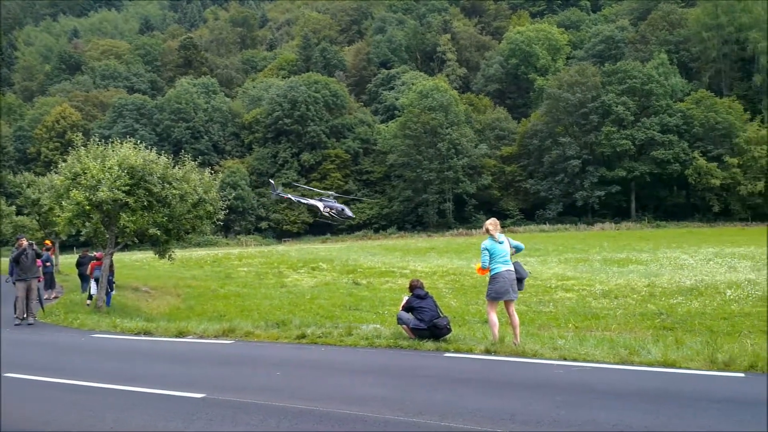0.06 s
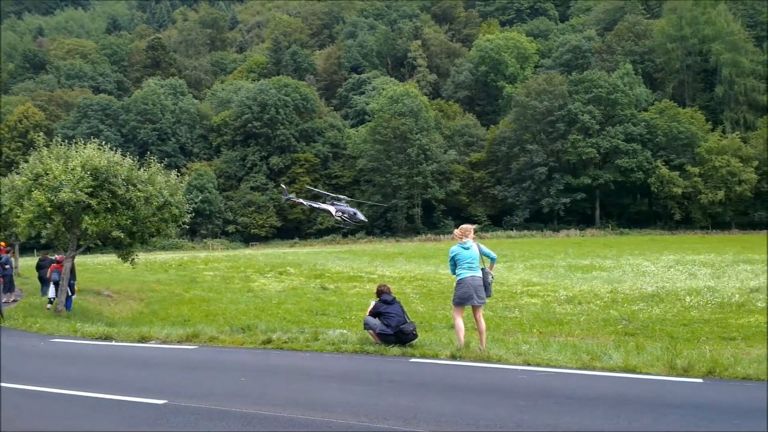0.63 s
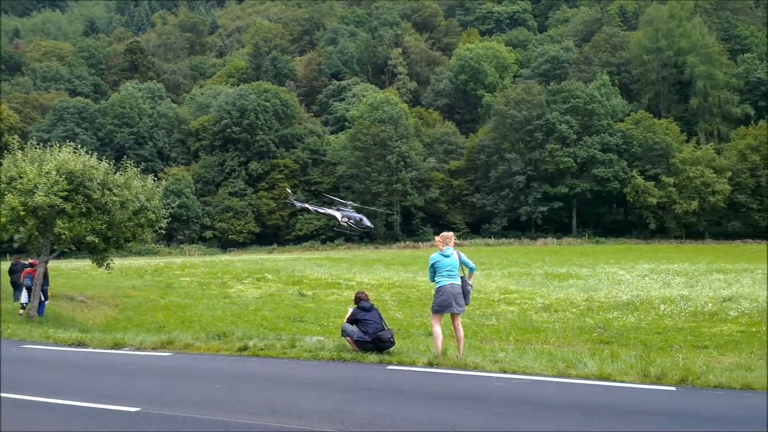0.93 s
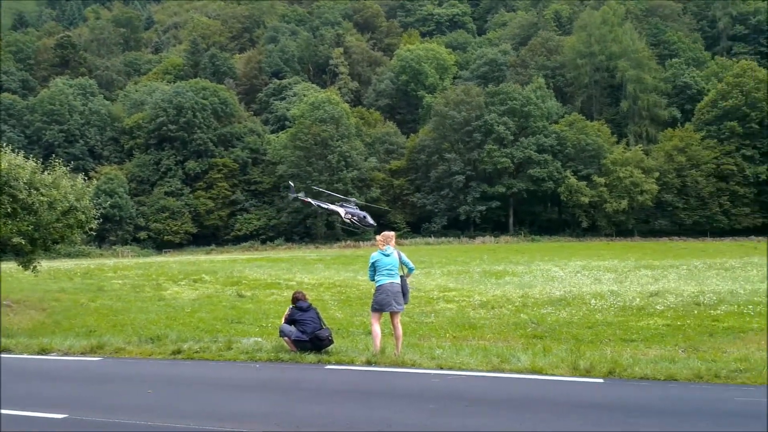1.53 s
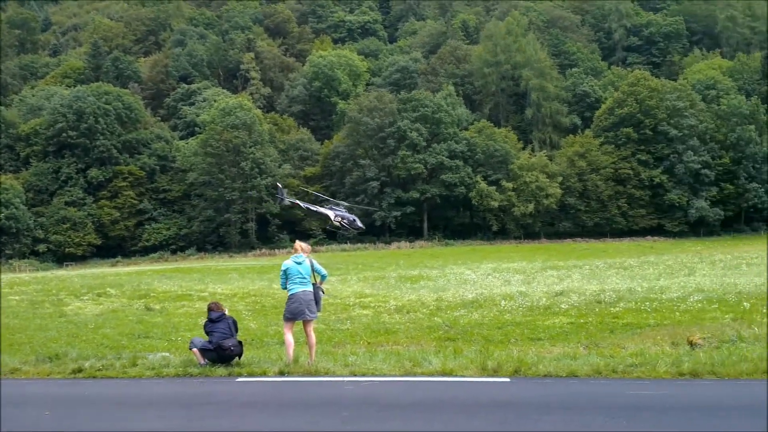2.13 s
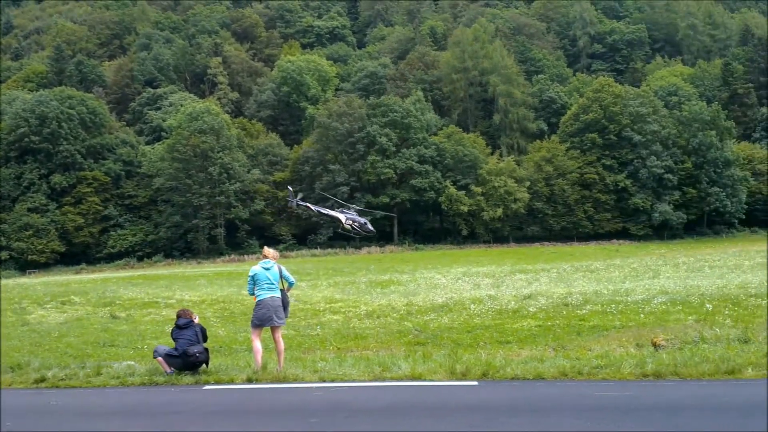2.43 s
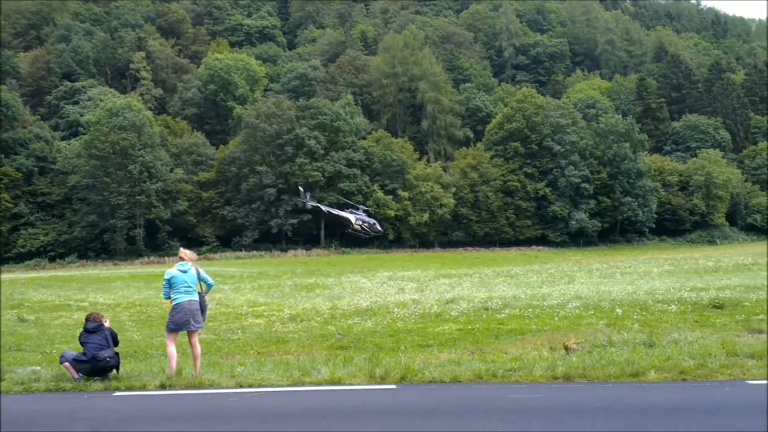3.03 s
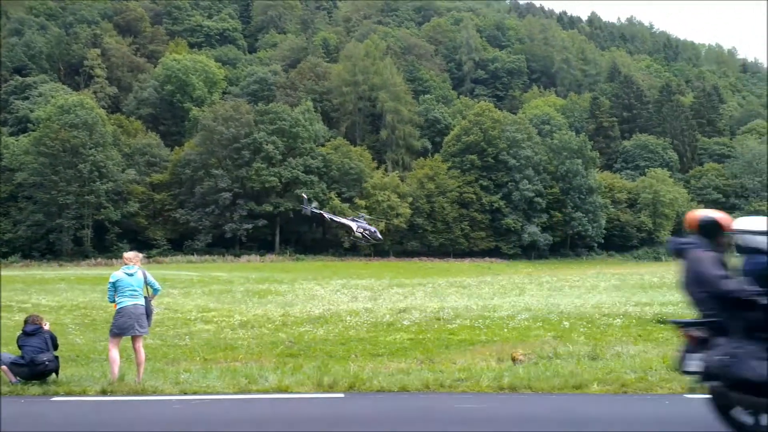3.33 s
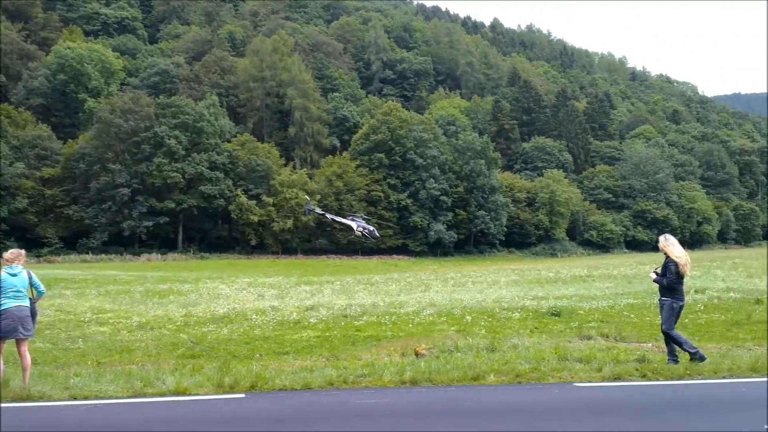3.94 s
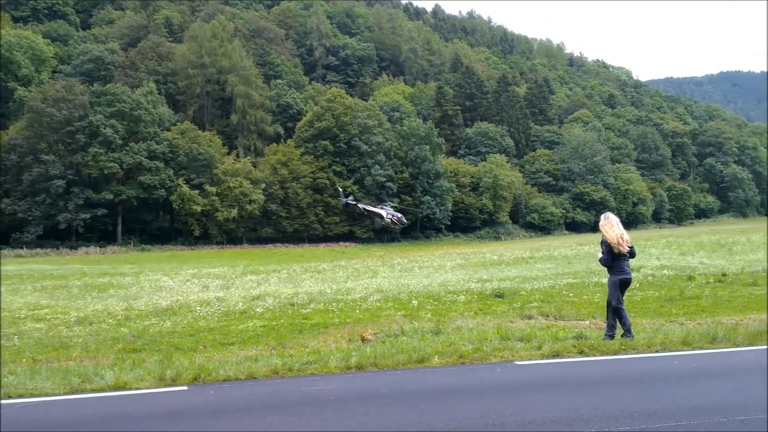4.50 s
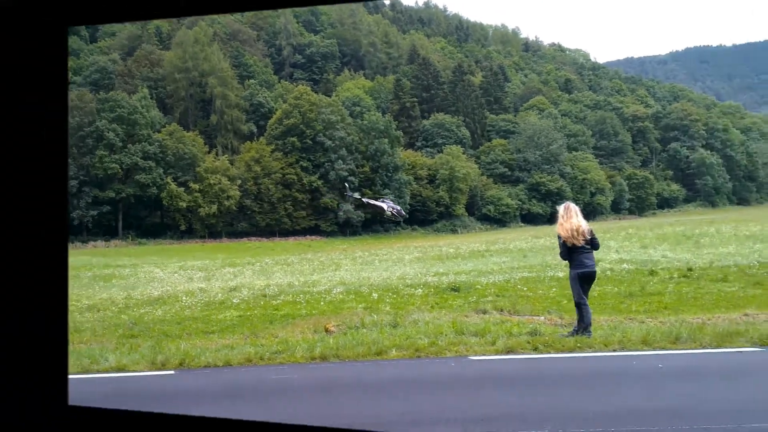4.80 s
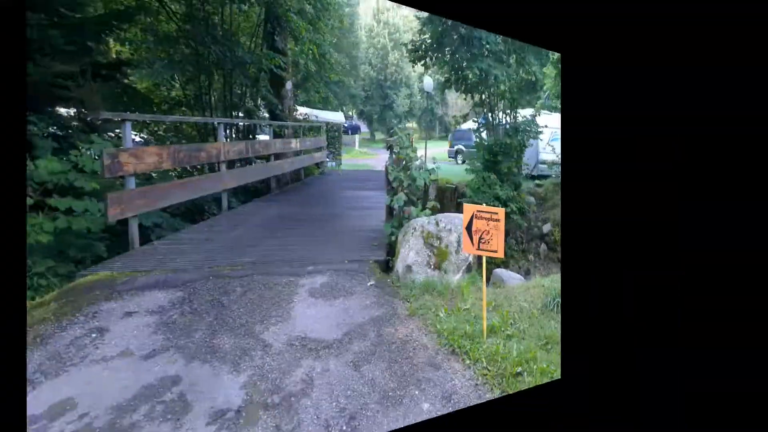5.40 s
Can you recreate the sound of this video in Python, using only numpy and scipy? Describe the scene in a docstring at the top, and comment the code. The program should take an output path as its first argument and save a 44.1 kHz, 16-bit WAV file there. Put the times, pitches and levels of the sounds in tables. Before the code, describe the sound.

A model helicopter's rotor rattles and its engine drones as it flies over a field, with gusty wind rushing and hissing.

```python
"""A model helicopter flies low over a field, heard from the roadside.
Its rotor chops the air and slaps when a blade hits the swirl left by the blade before.
The engine drones at four times the blade rate, and the rotor's wash throbs about 19 times a second.
Gusty air rushes and hisses across two microphone openings (ports), now more left, now more right."""
import sys
import numpy as np
from scipy import signal
from scipy.fft import rfft, irfft
from scipy.io import wavfile
from scipy.ndimage import uniform_filter1d, minimum_filter1d

SR = 44100
rng = np.random.default_rng(int(sys.argv[2]) if len(sys.argv) > 2 else 0)


def unload_audio(sound):
    """Save the sound as a 16-bit wav file, at the path given as the first command line argument."""
    columns = np.transpose(np.atleast_2d(sound))
    # keep every value between -1 and 1, then stretch to whole-number steps
    steps = np.round(np.clip(columns, -1, 1) * 32767)
    wavfile.write(sys.argv[1], SR, steps.astype(np.int16))


N = 249606
TIME = np.arange(N) / SR
FRAME, HOP = 512, 128  # the air is shaped in short frames: their length and step in samples
FRAME_TIME = np.arange(N // HOP + 5) * HOP / SR
BIN_HZ = np.fft.rfftfreq(FRAME, 1 / SR)


def amp(db):
    """Turns decibels into a gain."""
    return 10 ** (np.asarray(db) / 20)


def unit_level(x):
    """Scales a signal to an average (rms) level of 1."""
    return x / np.sqrt(np.mean(x ** 2) + 1e-20)


def at_time(rows, t=TIME):
    """Joins a table's points with straight lines and reads it at times t."""
    return np.interp(t, *np.transpose(rows))


def at_pitch(rows, hz):
    """Reads a table at frequencies hz, with octaves evenly spaced."""
    row_hz, value = np.transpose(rows)
    return np.interp(np.log(hz + 1), np.log(row_hz + 1), value)


def drift(rate_hz, count=N, fs=SR):
    """A random wobble that changes up to about rate_hz times a second."""
    hz = np.fft.rfftfreq(count, 1 / fs)
    return unit_level(irfft(rfft(rng.standard_normal(count)) / (1 + (hz / rate_hz) ** 4), count))


def bell(offset, width, steepness=2):
    """A hump of height 1 that is `width` wide at half height."""
    return np.exp(-np.log(2) * abs(2 * offset / width) ** steepness)


def bumps(rows):
    """Adds up bumps (time, height, length) that build gently and end abruptly."""
    return sum(height * bell(FRAME_TIME - s, length, np.where(FRAME_TIME < s, 2.5, 5))
               for s, height, length in rows)


# The side the wind strikes. Each row: time in seconds, left minus right in dB (scaled for each sound).
SIDE_WIND = [(0, 3), (.65, 1), (1.6, 0.5), (1.83, -2.5), (2.1, -2.5), (2.27, 2), (2.55, .5), (3.1, 3),
             (3.96, -1), (4.08, 2), (4.19, -4), (4.28, 0), (4.42, -3.5), (5.66, -2)]

def wind_pan(depth):
    """Left and right gains for a sound that swings with the wind."""
    gains = amp(depth * np.outer([.5, -.5], at_time(SIDE_WIND)))
    return gains / gains.mean(0)


# Brief drops in the wind. Each row: time in seconds, depth in dB, length in seconds.
LULLS = [(.044, 3.5, 0.011), (.085, 7.5, 0.069), (.154, 1.5, 0.056), (.312, 4, 0.018), (.408, 6, 0.032),
         (.46, 5, 0.032), (.533, 11, 0.049), (.953, 11.5, 0.052), (1.406, 6, 0.049), (1.553, 4.5, 0.045),
         (2.8, 2.5, 0.023), (2.888, 3.5, 0.032), (3.06, 3.5, 0.027), (3.102, 11, 0.049), (3.175, 5, .032),
         (3.395, 3.5, 0.017), (4.163, 6, 0.0076), (4.668, 4.5, 0.025), (4.878, 2.5, 0.032), (5.02, 3, .03),
         (5.2, 6, 0.062)]

def lulls_db():
    """How far the rush drops away in each frame."""
    return bumps(LULLS)


# How close the helicopter seems. Each row: time in seconds, boost in dB.
NEARNESS = [(0, -6), (1.3, 2), (2.5, 13), (3.2, 4), (3.95, 9.5), (4.4, 0), (5.2, -1), (5.66, -2.5)]
# Puffs of air on the ports. Each row: time in seconds, relative level in dB.
PUFFS = [(1.07, -43), (1.149, -40), (2.57, -42), (2.625, -42), (2.875, -41), (4, -40), (4.15, -44)]

def wind_rumble(top_hz=150, puff_s=0.013):
    """Air bumps the ports: a faint, lumpy rumble, strongest in wind from the left, and short thumps."""
    shared = drift(top_hz)
    air = unit_level(np.array([shared + drift(top_hz) for _ in range(2)]))
    puffs = sum(amp(db + 2) / 2 * np.exp(-((TIME - s) / puff_s) ** 2) for s, db in PUFFS)
    rumble_db = -71 + 4.2 * at_time(SIDE_WIND) + 0.32 * at_time(NEARNESS)
    lumps = unit_level(amp(5 * drift(25)))
    return air * (amp(rumble_db) * lumps + puffs)


# How the ports differ in level. Each row: frequency in Hz, left minus right in dB.
PORT_BALANCE = [(200, 3), (330, 1.5), (580, 4), (1000, 0), (1900, -1.5), (3000, 2.5), (4000, 0), (12000, 3)]
# How they differ in timing. Each row: frequency in Hz, the left port's lead in radians.
PORT_PHASE = [(1400, 0.11), (2000, 0.83), (3000, 0.22)]

def port_gain(hz):
    """Each port picks up the air a little differently."""
    left = amp(at_pitch(PORT_BALANCE, hz) / 2) * np.exp(.5j * at_pitch(PORT_PHASE, hz))
    return np.array([left, 1 / left])


# Swells of the hiss. Each row: time in seconds, dB above its usual level.
HISS = [(0, -3), (1.8, -1), (2.2, 6), (2.38, 1), (2.7, 2.5), (3.05, -2.5), (3.33, 0.5), (3.55, -1.5),
        (4.02, 4), (4.13, -5), (4.82, -5.5), (5.04, 1), (5.32, 1.5), (5.5, -3), (5.66, -6.5)]
# Where the ports ring, left then right. Each row: centre in Hz, width in Hz.
PORT_RINGS = [(10160, 2300), (7410, 1920)]
# How hard they ring. Each row: boost in dB, extra dB per dB of side wind, extra dB per dB of hiss.
PORT_DRIVE = [(3.5, 0.6, 1), (8.3, -1, -0.15)]

def port_hiss_db():
    """Each port rings in its own band of hiss, more in wind on its side; the right usually most."""
    bands = np.array([bell(BIN_HZ - centre, width, 3) for centre, width in PORT_RINGS])
    side, hiss = at_time(SIDE_WIND, FRAME_TIME), at_time(HISS, FRAME_TIME)
    boost_db = np.array([db + by_side * side + by_hiss * hiss for db, by_side, by_hiss in PORT_DRIVE])
    treble = at_pitch([(3800, 0.26), (5000, 0.97)], BIN_HZ)
    return bands[:, :, None] * boost_db[:, None] - np.outer(treble, boost_db.mean(0) / 2)


# A hollow in the sound. Each row: time in seconds, centre in Hz, cut in dB (below zero it boosts).
GROUND_DIP = [(0, 1040, 10), (1, 1040, 8), (1.25, 990, -4), (1.62, 870, 8.5), (2.4, 765, -2.5),
              (3.8, 786, 3.5), (4.4, 840, 10.5), (5.66, 950, 4)]

def ground_dip_db(width_hz=230):
    """The echo off the ground cancels one moving band of the rush."""
    s, hz, depth_db = np.transpose(GROUND_DIP)
    offset_hz = BIN_HZ[:, None] - np.interp(FRAME_TIME, s, hz)
    return np.interp(FRAME_TIME, s, depth_db) * bell(offset_hz, width_hz)


# Ripples in the upper rush. Each row: time in seconds, spacing in Hz, greatest height in dB.
GROUND_RIPPLES = [(0, 667, 2.5), (1.1, 687, 0), (1.5, 660, 2), (3, 620, 3), (4, 578, 2.5), (5.66, 590, 0.5)]

def ground_ripples_db():
    """The ground's echo also adds evenly spaced, whining peaks."""
    s, spacing_hz, height_db = np.transpose(GROUND_RIPPLES)
    reach = at_pitch([(1150, 0), (1500, .8), (2500, 1), (3600, 1), (5000, 0)], BIN_HZ)
    ripples = np.cos(2 * np.pi * BIN_HZ[:, None] / np.interp(FRAME_TIME, s, spacing_hz))
    return np.outer(reach, np.interp(FRAME_TIME, s, height_db)) * ripples


# Hoots and whistles. Each row: time in seconds, pitch in Hz, boost in dB, length in seconds.
WHISTLES = [(0.782, 800, 10, 0.38), (.9, 3420, 2, 0.72), (3.053, 2680, 7.5, 0.57), (5.356, 4330, 6.5, 0.14),
            (5.5, 1770, 6.5, 0.38)]

def whistles_db(width_share=0.12):
    """Narrow bands ring out of the rush and sink back."""
    return sum(np.outer(np.exp(-(2 * (BIN_HZ / hz - 1) / width_share) ** 2), bumps([(s, db, length)]))
               for s, hz, db, length in WHISTLES)


# The pulse of the rotor's wash. Each row: time in seconds, throbs a second, swing in dB.
THROB = [(0, 19.5, 2.5), (.45, 19.5, 3.6), (.85, 19.6, .6), (2, 19.9, .5), (4.1, 19.3, .8),
         (4.75, 18.3, 1.7), (5.66, 18.9, .8)]

def throb_db():
    """The air pushed by the rotor rises and falls quickly and evenly."""
    s, rate, swing_db = np.transpose(THROB)
    cycles = np.cumsum(np.interp(FRAME_TIME, s, rate)) * HOP / SR
    return -np.interp(FRAME_TIME, s, swing_db) * np.cos(2 * np.pi * cycles)


# Short gusts. Each row: time in seconds, treble boost in dB, roar boost in dB, length in seconds.
GUSTS = [(.009, 5, 6.5, 0.0095), (0.183, 3.5, 5, 0.015), (0.226, 3, 0, 0.048), (0.993, 2, -0.5, 0.031),
         (1.14, 1, 5, 0.033), (1.47, 3.5, 3, 0.023), (2.102, 2, 1.5, 0.057), (2.854, 3.5, -1, .035),
         (3.322, 3, 3, 0.11), (4.064, 6.5, 2, 0.036), (4.267, 3, 1, 0.082), (4.423, 1, 5.5, 0.029),
         (4.645, 3, 5, 0.027), (4.96, 3, 2.5, 0.055), (5.063, 2.5, -1, 0.038), (5.326, 6, 2.5, 0.072),
         (5.438, 2, 4.5, 0.04), (5.569, 3.5, 2, 0.05)]

def gusts_db():
    """Gusts, lulls and the throb shake the rush; the treble sinks furthest in a lull."""
    s, treble_db, roar_db, length = np.transpose(GUSTS)
    drop_db = lulls_db() - throb_db()
    high_db = bumps(zip(s, treble_db, length)) - drop_db
    low_db = bumps(zip(s, roar_db, length)) - 0.7 * drop_db
    treble = at_pitch([(700, 0), (3500, 1)], BIN_HZ)
    return np.outer(treble, high_db) + np.outer(1 - treble, low_db)


# How hard the blades bite the air. Each row: time in seconds, relative load in dB.
BLADE_LOAD = [(0, 8.5), (.9, 1.5), (1.22, 5.5), (1.55, 11.5), (1.78, 0), (1.89, -3.5), (2.2, -2),
              (3.05, 8.5), (3.35, 0), (4.3, 4.5), (4.95, -8), (5.35, -10.5), (5.66, -4)]
# The air's roar. Each row: time in seconds, relative level in dB.
ROAR = [(0, -24), (.85, -22), (1.1, -26), (1.65, -23), (2.18, -29), (2.4, -24.5), (3.28, -31.5),
        (3.55, -23), (4.4, -24), (5, -30.5), (5.42, -31.5), (5.66, -25.5)]

def band_levels_db():
    """Five bands of air noise, low to high, swell with nearness, blade load and wind."""
    near, load, roar, hiss, side = (
        at_time(rows, FRAME_TIME) for rows in (NEARNESS, BLADE_LOAD, ROAR, HISS, SIDE_WIND))
    drone = -46 + near
    honk = -26.5 + 0.34 * load
    rush = -28.5 + 0.075 * load + 0.16 * hiss + 0.47 * side
    return np.array([drone, roar, honk, rush, -31.5 + hiss])


# The borders of those five bands, in Hz.
BAND_EDGES_HZ = [180, 400, 850, 1800, 4700, 12000]
# The air's basic tone. Each row: frequency in Hz, relative level in dB.
AIR_TONE = [(160, -46), (225, -32.5), (290, -16.5), (410, -18.5), (470, -4.5), (550, 5), (690, 5.5),
            (790, 1.5), (1000, 4.5), (1350, 5), (1540, 0.5), (2100, -5), (3900, -9.5), (4900, -20.5),
            (10800, -25.5), (12200, -38), (15500, -52.5)]
# How alike left and right are. Each row: frequency in Hz, likeness from 0 to 1.
LIKENESS = [(60, 0.1), (280, 0.86), (1400, 0.81), (2200, 0.21), (3100, 0.36), (6000, 0.51), (8000, 0.067),
            (15000, 0.05)]

def rushing_air(patchy_db=1.5, flutter_db=1.0, trim_db=-1.33):
    """Swirling air makes noise whose bands swell on their own and flutter together."""
    hz = np.fft.rfftfreq(N, 1 / SR)
    left, other = rfft(rng.standard_normal((2, N)))
    alike = at_pitch(LIKENESS, hz)
    right = alike * left + np.sqrt(1 - alike ** 2) * other
    spectrum = np.array([left, right]) * amp(at_pitch(AIR_TONE, hz)) * port_gain(hz)
    # Bring each band to its level, blending into its neighbours.
    edges = np.array(BAND_EDGES_HZ)
    power = 2 * abs(spectrum.mean(0)) ** 2 / N ** 2
    band_power = [power[(hz > low) & (hz < high)].sum() for low, high in zip(edges, edges[1:])]
    swell_db = band_levels_db() + trim_db - 10 * np.log10(band_power)[:, None]
    centres = np.sqrt(edges[1:] * edges[:-1])
    blend = np.array([at_pitch(np.c_[centres, row], BIN_HZ) for row in np.eye(len(centres))])
    # Random loud and soft patches, smoothed over pitch and time.
    speckle = rng.standard_normal((len(BIN_HZ), len(FRAME_TIME)))
    patches = unit_level(uniform_filter1d(uniform_filter1d(speckle, 5, axis=0), 13, axis=1))
    flutter = drift(55, count=len(FRAME_TIME), fs=SR / HOP)
    air_db = blend.T @ swell_db + gusts_db() + patchy_db * patches + flutter_db * flutter
    shape_db = air_db - ground_dip_db() + ground_ripples_db() + whistles_db() + port_hiss_db()
    frames = signal.stft(irfft(spectrum, N), nperseg=FRAME, noverlap=FRAME - HOP)[2]
    frames *= amp(shape_db)[..., :frames.shape[-1]]
    return signal.istft(frames, nperseg=FRAME, noverlap=FRAME - HOP)[1][:, :N]


# The drone's tones. Each row: multiple of the blade rate, relative level in dB.
ENGINE_TONES = [(3, -26), (4, -9.7), (5, -16), (7, -8), (8, -5.5), (10, -4.5), (16, -8), (17, -6), (18, -4),
                (19, -5)]
# The drone's loudness. Each row: time in seconds, level in dB before lulls and panning.
ENGINE_LEVEL = [(0, -58), (1.85, -35), (2.4, -33), (3.4, -42), (3.8, -37), (4.5, -39), (5.66, -53)]

def engine(cycles, fading_db=6.0, blur=0.0027):
    """Tones of the firing (multiples of four) and the rotor waver on their way over the ground."""
    tones = sum(amp(db + fading_db * drift(32)) * np.sin(2 * np.pi * k * (cycles + blur * drift(22)))
                for k, db in ENGINE_TONES)
    return amp(at_time(ENGINE_LEVEL)) * unit_level(tones)


# The whine's loudness. Each row: time in seconds, level in dB before lulls and panning.
WHINE_LEVEL = [(0, -37), (2.65, -47), (2.93, -36), (3.75, -44), (3.87, -20), (3.98, -43), (4.74, -30.5),
               (5.1, -31.5), (5.3, -38.5)]

def exhaust_whine(cycles, multiple=20, fading_db=4.5, blur=.0075):
    """One high, nasal engine tone sings out at the times the exhaust faces the listener."""
    fading = amp(fading_db * drift(23))
    tone = np.sin(2 * np.pi * multiple * (cycles + blur * drift(15)))
    return amp(at_time(WHINE_LEVEL)) * unit_level(fading * tone)


# The ticks the blades cut into the air. Each row: time in seconds, relative strength.
CHOP = [(0, .7), (.85, 1.2), (1.3, .7), (1.6, .35), (2.3, .6), (3.5, .2)]

def blade_chop(air, passes, tick_width=.085, lumpy_db=1.3):
    """Each passing blade cuts its own tick into the roar; the hiss stays even and the bass thin."""
    roar = signal.sosfiltfilt(signal.butter(2, 2800, fs=SR, output="sos"), air)
    hiss = air - roar
    blade = np.round(passes).astype(int)
    strength = (.5 + rng.random(blade.max() + 1))[blade]
    ticks = at_time(CHOP) * strength * np.exp(-((passes - blade) / tick_width) ** 2)
    gain = unit_level((1 + ticks) * amp(lumpy_db * drift(200)))
    return signal.sosfilt(signal.butter(4, 150, "high", fs=SR, output="sos"), roar * gain + hiss)


def slap(db, hz, length, rough_s=.0065):
    """A blade hits the swirl of the one before: a few quick waves, raspier the longer they last."""
    t = np.arange(-SR // 100, SR // 100) / SR
    noise = rng.standard_normal(len(t))
    puff = unit_level(signal.lfilter(*signal.butter(2, [500, 2000], "band", fs=SR), noise))
    tone = np.cos(2 * np.pi * (hz * t + rng.random()))
    rasp = (length / rough_s) ** 2
    return amp(db) * bell(t, length) * (tone + rasp * puff) / np.hypot(1, rasp)


# The running rattle of slaps. Each row: time in seconds, typical level in dB, typical pitch in Hz.
RATTLE = [(0, -24, 1400), (1.05, -23, 1400), (1.23, -17.5, 1350), (1.36, -17.5, 1340), (1.42, -23, 1340),
          (1.5, -13.5, 1300), (1.72, -14, 1260), (1.9, -28, 1200), (2.25, -17, 1130), (2.7, -21.5, 1280),
          (3.4, -22.5, 1290), (3.62, -18.5, 1270), (4.3, -21, 1220), (5, -26, 1250), (5.66, -26, 1330)]
# Single hard slaps. Each row: time in seconds, level in dB, pitch in Hz, length in seconds.
HARD_SLAPS = [(.031, -13.5, 1000, .005), (.059, -14.5, 750, .006), (.116, -14.5, 1050, .0055),
              (.262, -13, 620, .005), (.487, -12.5, 560, .006), (.541, -14, 1310, .003),
              (1.027, -8.5, 660, .0042), (1.075, -13, 750, .003), (1.201, -10.5, 1200, .003),
              (1.383, -13, 1230, .002), (1.407, -12, 1370, .0035), (1.53, -9.5, 1260, .0035),
              (1.642, -11, 1290, .0045), (1.712, -11, 1240, .004), (1.786, -13, 1130, .003),
              (2.567, -12, 620, .0045), (2.756, -12, 1180, .003), (2.875, -10.5, 1380, .0035),
              (3.006, -11, 1310, .0045), (3.096, -11.5, 1330, .003), (3.1695, -9, 1320, .0035),
              (3.224, -13, 1250, .0035), (3.376, -19.5, 340, .0055), (4.15, -14, 1130, .004)]

def blade_slaps(passes, uneven_db=1.7, pitch_scatter=.05, length_s=.0035):
    """One slap for each passing blade, never twice the same, with hard ones standing out."""
    times = TIME[1:][np.diff(np.floor(passes)) > 0]
    row_s, row_db, row_hz = np.transpose(RATTLE)
    loud, sharp, late = rng.standard_normal((len(times), 3)).T
    usual_db = np.interp(times, row_s, row_db)
    drop_db = 0.6 * np.interp(times, FRAME_TIME, lulls_db() - throb_db())
    levels_db = usual_db + uneven_db * loud - drop_db
    pitches_hz = np.interp(times, row_s, row_hz) * (1 + pitch_scatter * sharp)
    wander_s = np.minimum(.0005 * amp(-15 - usual_db) ** 2, .002)  # loud slaps keep time best
    # The rattle leaves a gap for each hard slap.
    rattle = [(s, db, hz, length_s) for s, db, hz in zip(times + wander_s * late, levels_db, pitches_hz)
              if s > .011 and min(abs(s - hard[0]) for hard in HARD_SLAPS) > .007]
    out = np.zeros(N)
    for s, db, hz, length in rattle + list(HARD_SLAPS):
        sound = slap(db, hz, length)
        start = round(s * SR - len(sound) / 2)
        out[start:start + len(sound)] += sound[:N - start]
    return out


# The rotor's speed. Each row: time in seconds, blade passes a second.
BLADE_RATE = [(0, 68.2), (3.2, 68.2), (4.2, 67.9), (5.66, 67.5)]
# How late a blade meets the swirl. Each row: time in seconds, delay in blade passes.
SLAP_LAG = [(0, .3), (1.58, .31), (1.65, .03), (1.73, -.18), (1.81, -.18), (2.08, .28), (2.3, .04),
            (2.9, 0), (3.7, .42), (5.66, 1.4)]

def scene():
    """The helicopter stays near the middle while the rushing air swings from side to side."""
    cycles = np.cumsum(at_time(BLADE_RATE) * (1 + .0008 * drift(5))) / SR  # one cycle for each blade
    passes = cycles - at_time(SLAP_LAG)
    lull_gain = amp(-np.interp(TIME, FRAME_TIME, lulls_db()))
    helicopter = blade_slaps(passes) + lull_gain * (engine(cycles) + exhaust_whine(cycles))
    air = blade_chop(rushing_air(), passes)
    return air * wind_pan(depth=2.17) + helicopter * wind_pan(depth=0.9) + lull_gain * wind_rumble()


def record(dry, ceiling_db=-8.8, top_hz=15750):
    """A quick limiter holds the peaks down, then a filter removes the highest treble."""
    allowed = np.minimum(1, amp(ceiling_db) / (abs(dry) + 1e-9))
    gain = uniform_filter1d(minimum_filter1d(allowed, size=130, axis=1), size=130, axis=1)
    lowpass = signal.firwin(1023, top_hz, window=("kaiser", 9), fs=SR)
    return signal.oaconvolve(dry * gain, lowpass[None], "same")


dry = scene()
out = record(dry)
unload_audio(out)
```